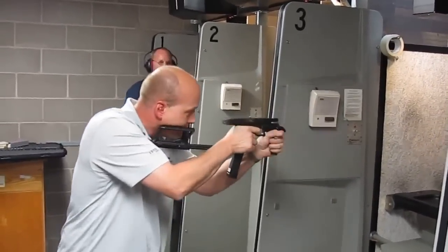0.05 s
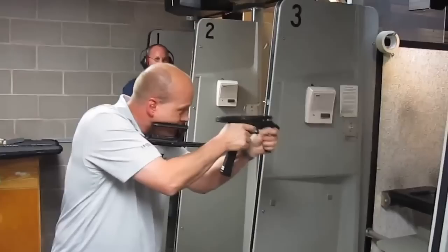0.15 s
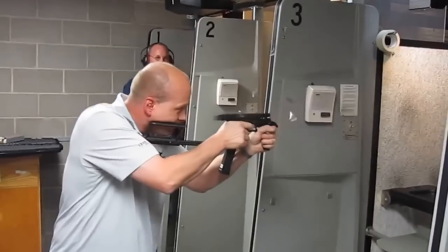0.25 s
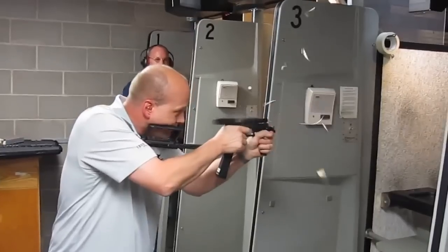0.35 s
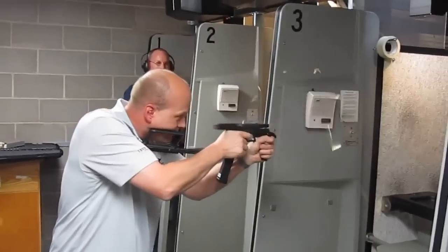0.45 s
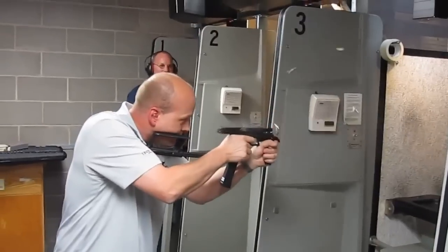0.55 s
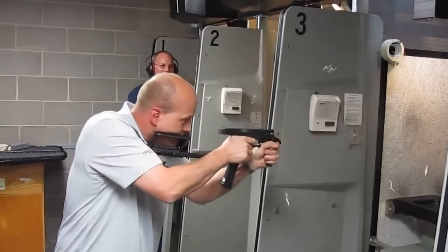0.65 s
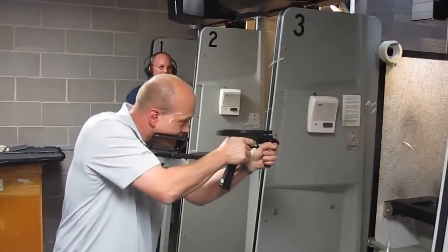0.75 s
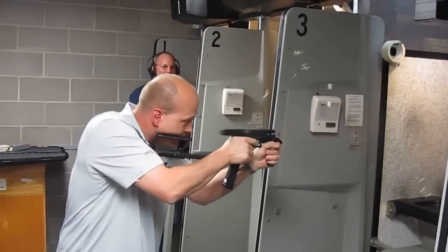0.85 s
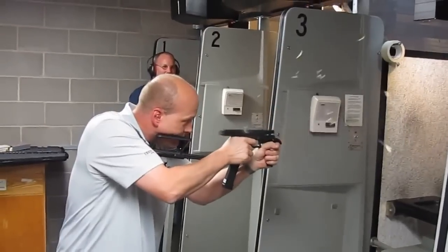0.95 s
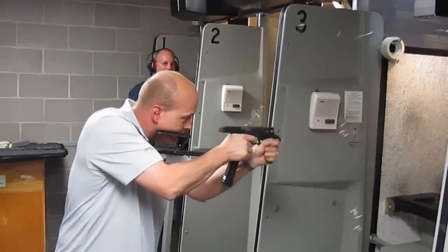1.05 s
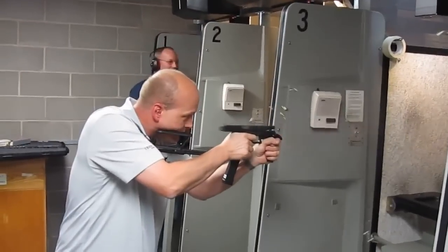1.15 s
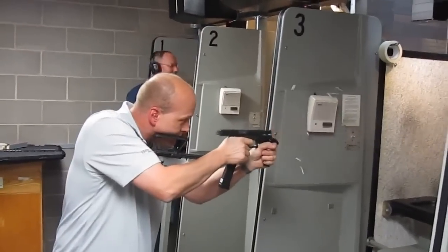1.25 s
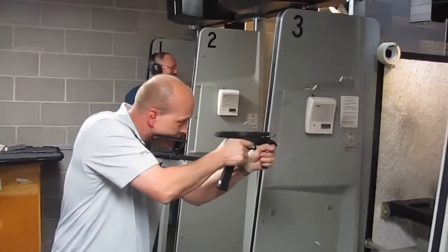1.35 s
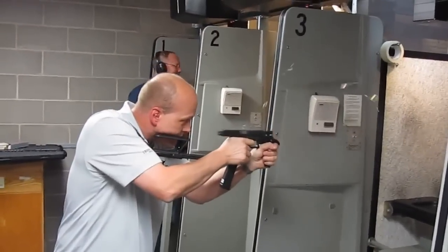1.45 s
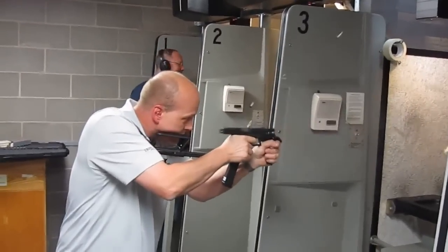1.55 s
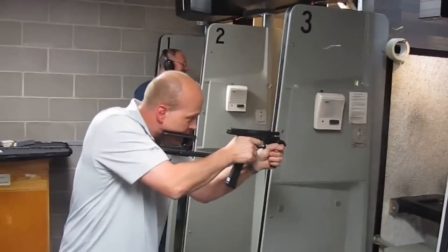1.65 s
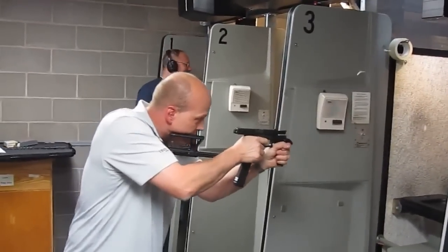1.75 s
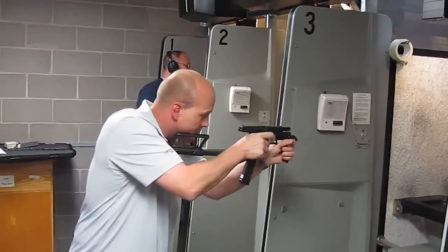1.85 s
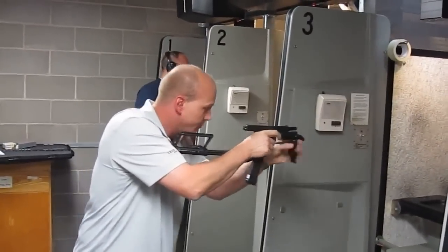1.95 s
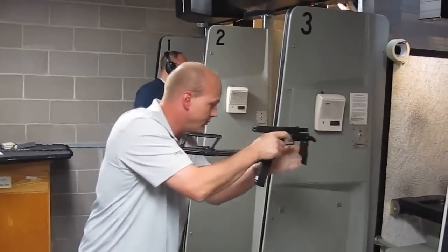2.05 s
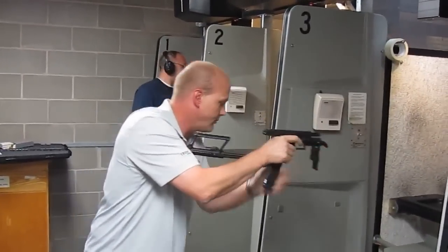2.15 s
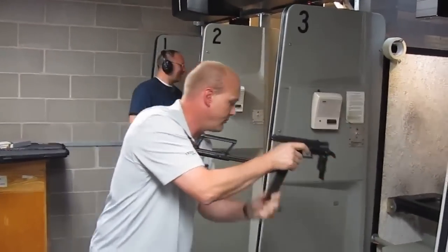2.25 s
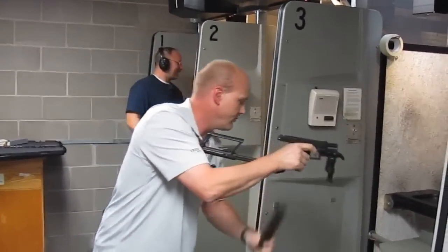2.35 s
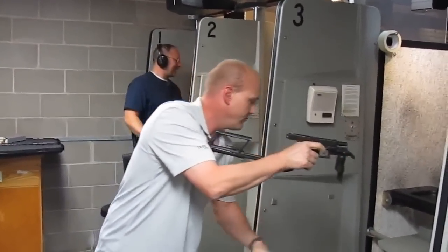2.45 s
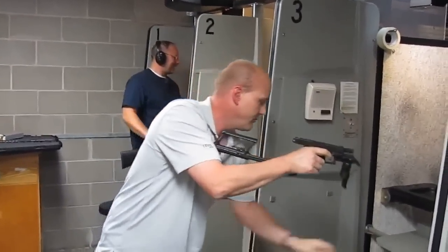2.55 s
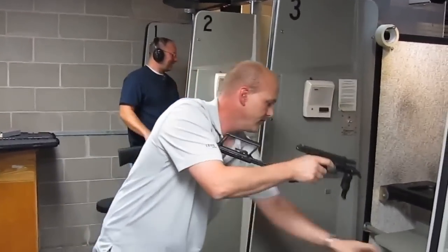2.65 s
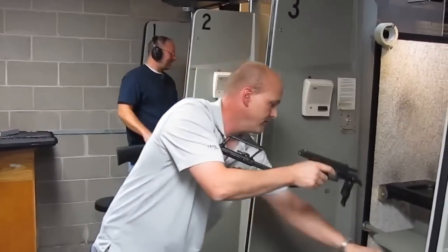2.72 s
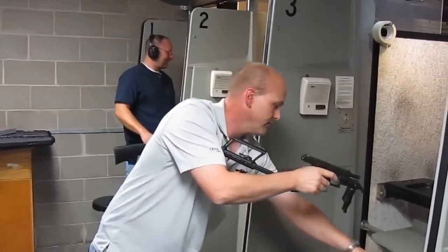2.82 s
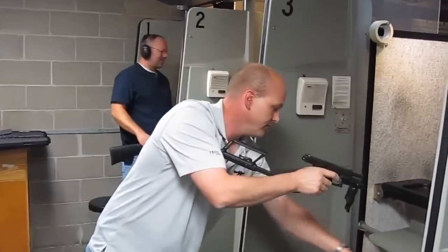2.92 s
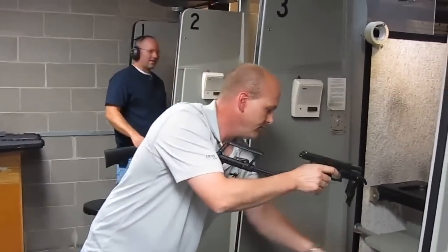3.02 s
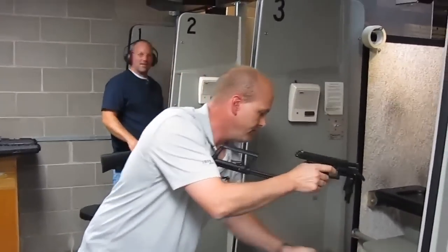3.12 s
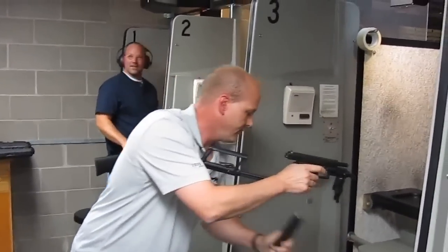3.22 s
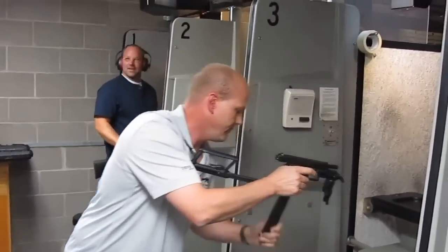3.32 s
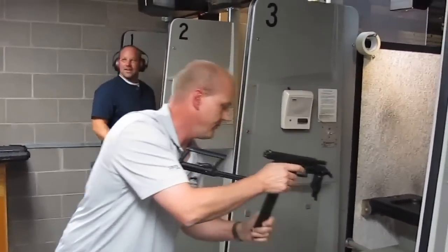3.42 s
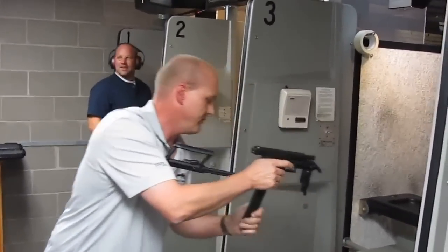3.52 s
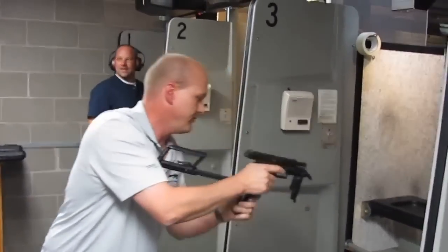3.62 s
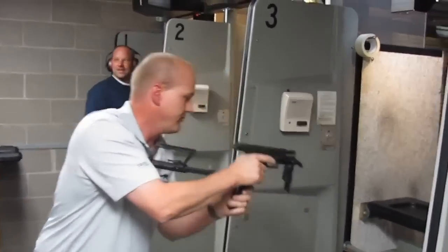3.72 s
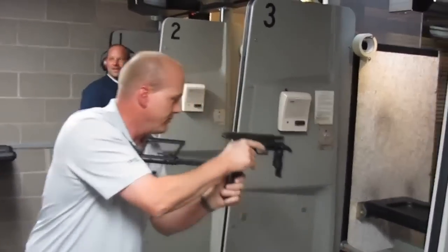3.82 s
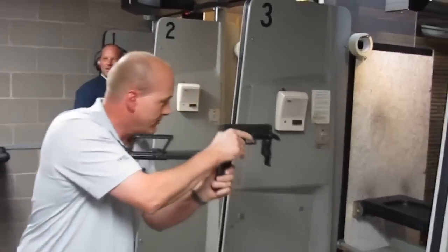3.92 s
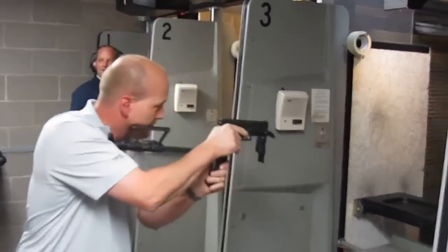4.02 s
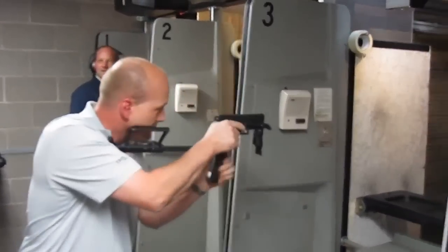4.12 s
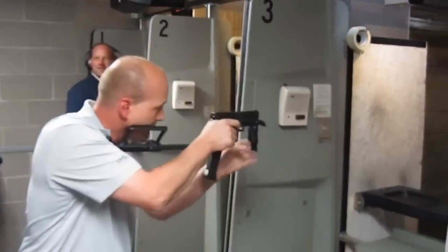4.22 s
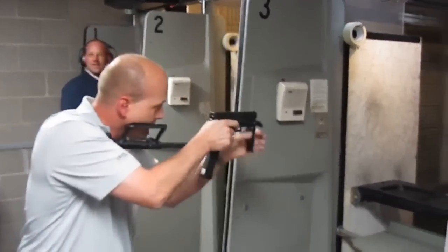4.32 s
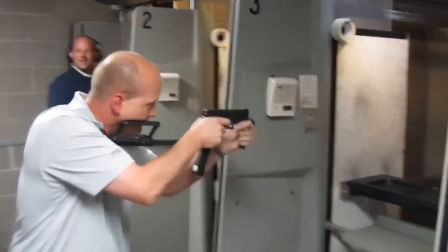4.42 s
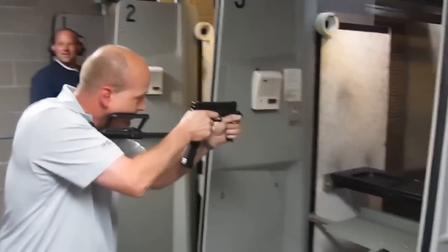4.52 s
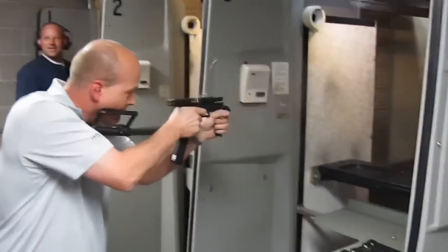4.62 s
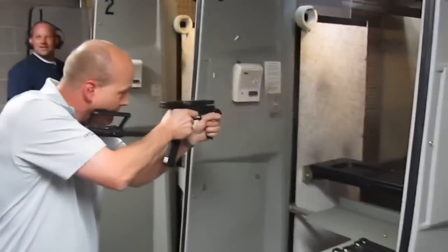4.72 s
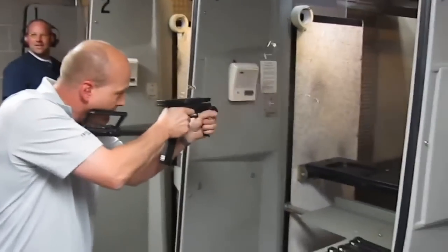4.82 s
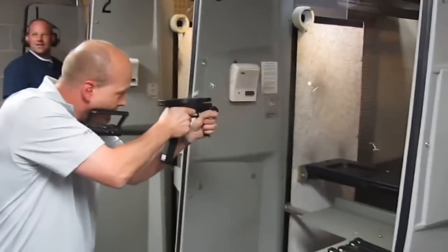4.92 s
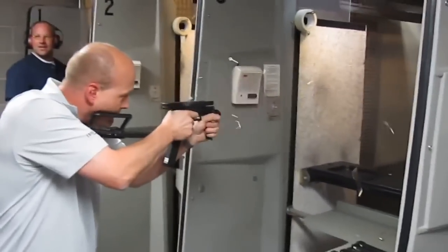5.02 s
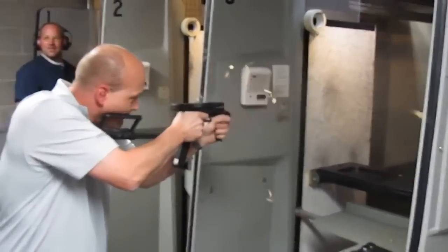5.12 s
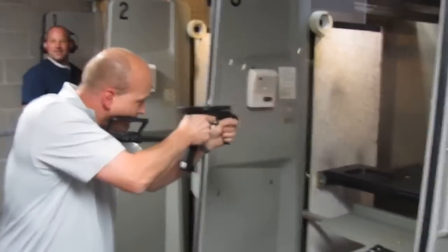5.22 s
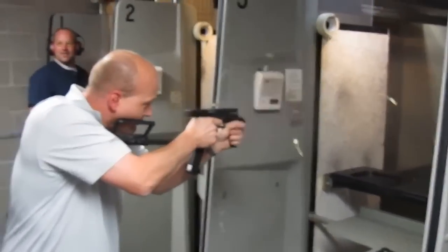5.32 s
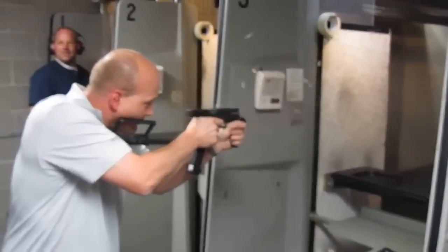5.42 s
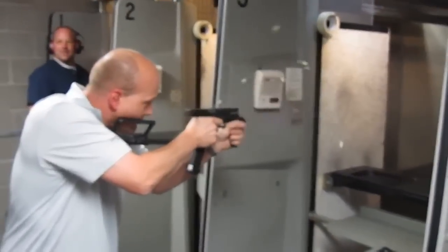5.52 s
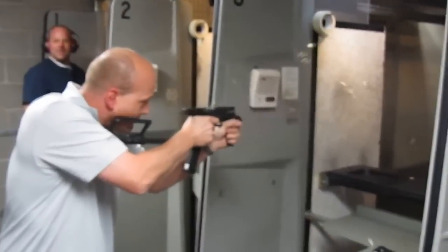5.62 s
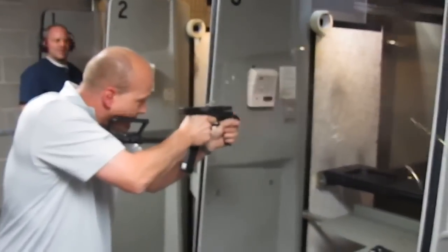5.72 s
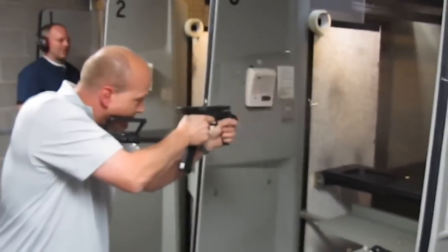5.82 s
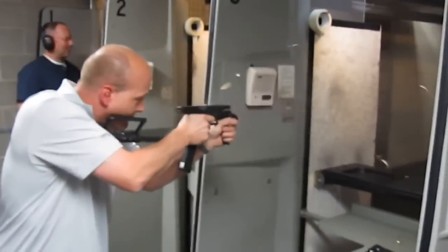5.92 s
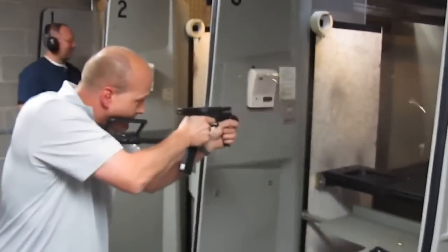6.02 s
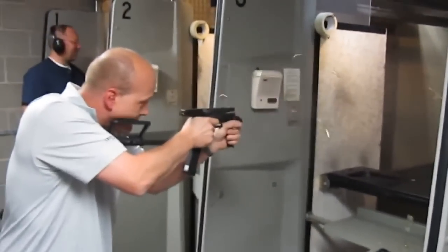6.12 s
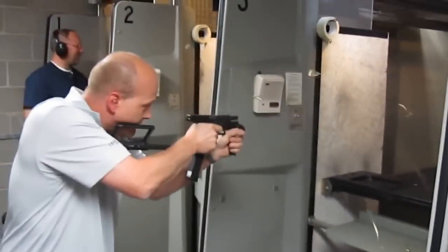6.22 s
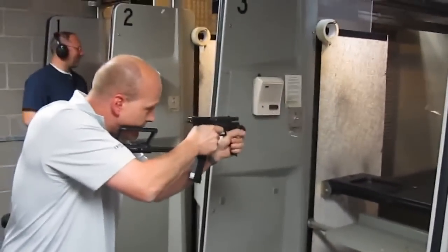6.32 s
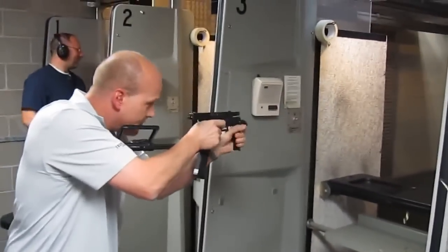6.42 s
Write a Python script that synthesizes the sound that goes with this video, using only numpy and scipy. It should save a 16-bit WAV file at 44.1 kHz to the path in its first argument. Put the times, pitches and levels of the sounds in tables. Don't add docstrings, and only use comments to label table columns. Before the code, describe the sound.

An automatic pistol empties two fast bursts in a hard indoor range, with ringing casings and metallic magazine-change knocks in the short gap between.

```python
import sys
import numpy as np
from scipy import signal
from scipy.fft import rfft, irfft
from scipy.io import wavfile
from scipy.ndimage import uniform_filter1d

SR = 44100
rng = np.random.default_rng(int(sys.argv[2]) if len(sys.argv) > 2 else 0)


def generate_wav(sig):
    pcm = np.round(np.clip(np.atleast_2d(sig).T, -1, 1) * 32767).astype(np.int16)
    wavfile.write(sys.argv[1], SR, pcm)


def gain_from_db(level_db):
    decades = np.asarray(level_db, float) / 20
    return 10 ** decades


N = 284886
TIME = np.arange(N) / SR

# [f/Hz, level/dB per Hz]
DRONE_COLOUR = [(15, -40), (30, 8), (60, 3), (160, -7.5), (420, -12), (750, -5.5), (1400, -6.5),
                (2000, -15), (2900, -17.5), (3900, -29.5), (5300, -29.5), (7000, -36), (10500, -46.5),
                (12500, -67)]
# [f/Hz, side minus mid/dB]
DRONE_WIDTH = [(60, -23.5), (110, -19), (200, -25), (380, -16), (700, -20), (1290, -14), (2380, -13),
               (4400, -7), (8120, 0), (15000, 1)]
# [f/Hz, width/Hz, level/dB]
DUCT_MODES = [(122.8, 8, -1), (197, 6.3, 0), (276, 36, 4), (343, 34, -3.5), (380, 3.6, -10), (416, 11, 3.5),
              (487, 5.6, 7.5), (524, 5.9, -18), (624, 5.7, -4), (660, 5.9, -3), (730, 13, -5)]
# [t/s, level/dB]
DRONE_RIDE = [(0, -29), (.047, -31), (.06, -53), (2.2, -37), (2.6, -40), (3, -40.5), (3.4, -38.5),
              (3.95, -35), (4.05, -35), (4.2, -33), (4.6, -28), (4.62, -53), (6.46, -62)]
# [t/s, level/dB]
UPPER_AIR = [(0, -2), (2.2, 3.5), (3.6, 1.5), (4.15, 1), (4.6, -4), (6.46, -4)]

# [f/Hz, width/Hz, level/dB]
BRASS_MODES = [(10670, 28, -8), (10725, 24, -7), (10790, 28, -7), (10860, 50, -11), (11020, 70, -12)]
# [t/s, level/dB]
ROLL_LEVEL = [(1.85, -74), (2.04, -44), (2.68, -47.5), (3.1, -45), (3.46, -44.5), (3.8, -48.5), (3.95, -56),
              (4.07, -55), (4.19, -70)]
# [t/s, level/dB]
ROLL_BUMPS = [
    (1.91, -40),
    (2.71, -47),
    (2.91, -42),
    (3.03, -56),
    (3.46, -47),
]
ROLL_SPAN = slice(78000, 190000)
BUMP_RISE_S, BUMP_FALL_DB_PER_S = 0.029, 131

# [t/s, bright level/dB, dull level/dB, dull f/Hz,
# t60/s]
HANDLING = [(2.0992, -19, -23, 1860, 0.16), (2.1475, -23.5, -25, 1820, 0.18), (2.189, -28, -21, 2400, 0.16),
            (2.2312, -45, -24, 2590, 0.059), (2.4846, -30, -21, 1975, 0.12), (2.5278, -33, -35, 1800, .52),
            (2.6491, -33, -20.5, 2530, 0.13), (2.7425, -31, -36, 2800, .06), (2.7492, -21, -25, 2130, 0.4),
            (2.9305, -28, -29.5, 2010, 0.34), (3.12, -35, -26, 2570, 0.19), (3.1355, -33, -34, 2120, 0.4),
            (3.2032, -31, -20.5, 2100, 0.19), (3.2606, -38, -35, 2000, 0.82),
            (3.5204, -38.5, -40, 1970, 0.43), (3.6688, -22.5, -25.5, 2050, 0.24),
            (3.9602, -34, -42, 3360, .2), (3.968, -24, -30, 1960, .22), (3.9759, -21, -26, 1910, .2),
            (3.9843, -11, -22, 1820, 0.11), (4.0002, -17.5, -29, 2870, 0.14), (4.016, -31, -37, 1820, 0.6),
            (4.6035, -14, -40, 2600, 0.14)]
# [f/Hz, level/dB per Hz]
RATTLE_COLOUR = [(600, -23.5), (1200, -9.5), (2200, -16), (3300, -12), (4000, -8), (4900, -10), (6250, -8),
                 (8000, -13.5), (10500, -20.5), (12500, -27), (15400, -39)]
# [f/Hz, side minus mid/dB]
KNOCK_WIDTH = [(60, 4), (110, -10), (200, -17), (380, -20), (700, -15), (1290, -17), (2380, -13.5),
               (4400, -7), (8120, -5), (15000, 3)]
# [f/Hz, level/dB, t60/s]
METAL_RINGS = [(1440, -13, 0.13), (2090, -14, 0.38), (2860, -9, 0.19), (4600, -13, 0.078),
               (5800, -5, 0.099), (6300, 3, 0.1), (10000, -4, 0.06), (6460, -18, 0.27), (7500, -22, 0.22),
               (8200, -2, 0.19)]
# [delay t/s, level/dB]
PARTITION_ECHOES = [
    (.0033, -9.5),
    (.009, -8),
    (0.018, -9),
    (.029, -8),
]
# [share of its pitch, level/dB]
PART_TONES = [(1, -13), (0.36, -5), (1.2, -6)]
# [t/s, bright level/dB, dull level/dB]
CASING_TICKS = [(2.247, -37, -30), (2.2867, -40, -39), (2.3216, -32.5, -49), (2.363, -38, -53),
                (2.3874, -41, -47), (2.4424, -41, -32), (2.5864, -36, -55), (2.6796, -38, -46),
                (2.7117, -42, -48), (2.8763, -39, -51), (2.898, -35, -50), (3.0155, -44, -38),
                (3.095, -42, -41), (3.1896, -39, -53), (3.309, -46, -38), (3.343, -40, -38.5),
                (3.3584, -44, -37), (3.3905, -46, -41), (3.432, -43, -38), (3.4984, -45, -36),
                (3.6192, -47, -42), (3.6444, -44, -40), (3.8684, -51, -42), (4.2554, -53, -49)]
# [t/s, level/dB, f/Hz, t60/s]
CONTACTS = [(2.0992, -19, 5120, .04), (2.102, -23, 6300, .03), (2.19, -17, 2510, .015),
            (2.233, -23, 2550, .02), (2.3216, -44, 5280, 0.12), (2.4846, -32, 5600, .02),
            (2.6491, -21.5, 3160, 0.019), (2.6525, -31, 2280, .03), (2.702, -36, 7500, .004),
            (2.7168, -39, 8000, .004), (2.7205, -37, 8200, .004), (2.7428, -27, 2900, .015),
            (2.7492, -20, 5400, .02), (2.7525, -21, 6130, .025), (2.7575, -30, 2180, .04),
            (2.7655, -24, 5850, .03), (2.9305, -32, 2980, 0.024), (2.934, -30, 1970, 0.13),
            (3.1238, -32, 3060, 0.021), (3.1375, -28, 2080, .08), (3.188, -36, 9500, .01),
            (3.191, -33, 8000, .008), (3.2065, -25, 2080, 0.035), (3.2195, -37, 2300, .03),
            (3.42, -34, 1900, .03), (3.433, -36, 4300, .01), (3.515, -37, 3520, 0.044),
            (3.669, -27, 5860, .03), (3.6698, -25, 3400, 0.022), (3.6785, -32, 2120, .04),
            (3.9843, -17, 6370, 0.013), (3.9846, -10, 8900, .012), (4.0005, -22, 6450, 0.024)]
# [t/s, level/dB, first ring f/Hz,
# second ring level/dB, second ring f/Hz]
PINGS = [
    (2.7965, -37, 11200, -47, 14790),
    (3.1921, -36, 11150, -46, 14790),
    (3.3594, -53, 11200, -50, 14800),
    (3.4974, -41, 11100, -48, 14900),
    (3.5389, -35, 11100, -65, 14900),
    (3.9843, -20, 10300, -48, 12300),
]
SCATTER_PAN_DB = -0.5
TICK_HZ, TICK_T60 = 2040, 0.16
TINKLE_HZ, TINKLE_DB, TINKLE_T60 = 5150, -14, 0.32

# [f/Hz, level/dB per Hz]
SLAM_COLOUR = [(18, -55), (30, -14), (102, -7), (140, -8.5), (318, 0.5), (411, 2.5), (596, 1), (900, -15),
               (1170, -43), (1980, -120)]
# [f/Hz, side minus mid/dB]
SLAM_WIDTH = [(60, 1), (110, 16), (200, 14.5), (380, 2), (700, 11), (1290, 1), (2380, -5), (4400, -3),
              (8120, -4.5), (15000, 2)]
# [t/s, level/dB, t60/s]
SLAMS = [
    (.048, -20, 0.41),
    (4.607, -22, 1),
]

# [f/Hz, level/dB per Hz]
RASP_COLOUR = [(35, -64), (60, -1), (138, -8), (442, -4.5), (754, -1.5), (2000, -3.5), (3180, -7),
               (4020, -12), (5430, -10.5), (7350, -13.5), (12500, -24.5), (14100, -29), (15400, -62.5)]
# [f/Hz, side minus mid/dB]
RASP_WIDTH = [(100, 10), (250, 13.5), (600, 14.5), (1500, -0.5), (4000, -1.5), (9000, -3), (15000, 5.5)]
# [first blast/dB, early sag t/s, sag/dB, settling t/s, settled/dB, last round/dB]
OVERLOAD = [
    (-14, 0.095, -14, 1, -14.5, -13),
    (-11, 0.049, -19, 0.82, -13.5, -13.5),
]
# [t after the last round/s, level/dB]
OVERLOAD_RELEASE = [
    (.1, -26.5),
    (.185, -21),
    (.3, -35),
]
RASP_CHOKE = .5

# [t/s, brightening of the early echoes/dB per octave]
FIRST_SHOTS = [
    (0.047, -0.9),
    (4.607, 0),
]
# [round number, t its blast chokes the capsules/s]
SLIDE_PACE = [
    [(0, .0997), (17, .9471), (18, .9951), (30, 1.5957)],
    [(0, 4.6602), (26, 5.9629), (27, 6.0163), (30, 6.1676)],
]
# [first round/dB, last round/dB, extra sag as the wind filter closes/dB]
REGAINED = [
    (-5.5, -5, -5),
    (-7, -4, -4.5),
]
# [t after the shot/s, level/dB]
WALL_RETURNS = [
    (.0022, -3.5),
    (.0065, 3.5),
    (.019, 1.5),
    (.0245, -3),
    (.0325, -1.5),
]
# [f/Hz, level/dB per Hz]
HALL_COLOUR = [(35, -75), (60, -25.5), (180, -31.5), (259, -26.5), (412, -16.5), (508, -13), (672, -6),
               (888, -8.5), (974, -3.5), (1780, -10.5), (2300, -10), (4020, -17.5), (7010, -17.5),
               (15400, -36.5)]
# [f/Hz, side minus mid/dB]
HALL_WIDTH = [(60, -13.5), (110, -23), (200, -18), (380, -23), (700, -18.5), (1290, -12), (2380, -11.5),
              (4400, -7), (8120, -1), (15000, 3)]
# [f/Hz, t60/s]
HALL_DECAY = [(100, 3.25), (300, 2.3), (410, 1.64), (560, 1.08), (700, 1.28), (1000, 1.245), (1400, 1.145),
              (2000, 1.05), (5000, 0.89), (10000, 0.51), (15000, 0.22)]
# [f/Hz, width/Hz, level/dB]
STALL_MODES = [(833.6, 14, 7), (1063, 17, 3), (341, 6.9, 5), (390, 6.3, -7), (680, 14, -9), (1510, 29, 6),
               (1680, 66, 2), (1860, 39, 6), (2160, 38, 3.5)]
# [f/Hz, level/dB]
EARLY_COLOUR = [(200, 2), (600, -3.5), (1000, -2.5), (1500, 1.5), (2100, 0), (2800, -1), (3600, -2),
                (6000, 3.5), (12000, -11)]
JITTER_S, ROUND_SPREAD_DB, SAG_WIDTH_S = .0006, 1.1, 0.037
FRESH_CAPSULES_DB = (0.5, 5)
CHOKE_DB, CHOKE_HOLD_S, CHOKE_RISE_S, CHOKE_CREEP_DB = 11.5, .03, .012, 4
OPENING_CHOKE = 0.91
RETURN_WIDTH_S = .002
HEADROOM_DB, FREE_DB = 13.5, -8.5
SHOT_SPREAD = 0.6
FIRST_BLAST_DB, FIRST_BLAST_S = (0, -3.5), 0.013

# [f/Hz, level/dB]
TREBLE_GATE = [(6000, -95), (9000, -66), (11300, -57), (12000, -53), (13000, -52.5), (14200, -57),
               (14800, -49), (16000, -45)]
CUT_CLOSES_S, CUT_CLOSING_S = (.15, 4.79), .045
CUT_OPEN, CUT_SHUT, CUT_EASED, CUT_OPENS_PER_S = 1, 3.24, (3.03, 3.3), 0.89
CUT_GAPE, CUT_GAPE_S = (0.71, 0.86), 0.1
CUT_OVERSHOOT, CUT_OVERSHOOT_S = (.1, .45), .3
CUT_STEEP = 0.27
MIC_NOTCH_HZ, MIC_NOTCH_WIDTH_HZ, MIC_NOTCH_DB = 4030, 520, -5
LONE_BINS = 0.49
STRAY_SHARE, STRAY_REACH_DB, STRAY_DB = .07, 20, 6
THUD_KNEE, THUD_HZ, THUD_DB = .85, 260, -4


def evened(x):
    return x / np.sqrt(np.mean(x ** 2) + 1e-20)


def read(points, hz):
    f, value = np.transpose(points)
    return np.interp(np.log(hz + 1), np.log(f + 1), value)


def curve(rows, outside=-120):
    s, value = np.transpose(rows)
    return np.interp(TIME, s, value, outside, outside)


def add(mix, s, sound):
    part = mix[:, round(s * SR):][:, :sound.shape[1]]
    part += sound[:, :part.shape[1]]


def peaks_db(peaks, f, lift_db):
    total = sum(gain_from_db(db + lift_db) / (1 + ((f - hz) / width * 2) ** 2) for hz, width, db in peaks)
    return 20 * np.log10(1 + total)


def wide_noise(size, db_of, side):
    hz = np.fft.rfftfreq(size, 1 / SR)
    z = rfft(rng.standard_normal((2, size))) * gain_from_db(db_of(hz))
    mid, across = irfft(z * gain_from_db([0 * hz, read(side, hz)]), size)
    return np.array([mid + across, mid - across]) / np.std(mid)


def drone():
    air = wide_noise(N, lambda f: read(DRONE_COLOUR, f) + peaks_db(DUCT_MODES, f, lift_db=6.5), DRONE_WIDTH)
    wobble_db = 1.2 * evened(uniform_filter1d(rng.standard_normal(N), size=3000))
    high_pass = signal.firwin(65, 1600, fs=SR, pass_zero=False)
    upper = signal.oaconvolve(air, high_pass[None], "same")
    return (air + upper * (gain_from_db(curve(UPPER_AIR)) - 1)) * gain_from_db(curve(DRONE_RIDE) + wobble_db)


def rolling():
    shape = (len(BRASS_MODES), 2, len(TIME[ROLL_SPAN]))
    strength = gain_from_db(2.0 * rng.exponential(1, shape))
    taps = strength * (rng.random(shape) < 60 / SR)
    t = np.arange(6000) / SR
    start = np.minimum(t / 0.0024, 1) ** 2
    rung = 0
    for tap, (hz, width, db) in zip(taps, BRASS_MODES):
        ring = gain_from_db(db) * start * np.exp(-np.pi * width * t) * np.sin(2 * np.pi * hz * t)
        rung = rung + signal.oaconvolve(tap, ring[None], axes=1)[:, :shape[2]]
    power = abs(uniform_filter1d((rung ** 2).mean(0), size=6000))
    out = np.zeros((2, N))
    out[:, ROLL_SPAN] = rung / np.sqrt(power + 1e-9)
    levels_db = [curve(ROLL_LEVEL)]
    for s, db in ROLL_BUMPS:
        levels_db.append(curve([(s - BUMP_RISE_S, db - 11), (s, db), (s + .5, db - BUMP_FALL_DB_PER_S / 2)]))
    return out * uniform_filter1d(sum(gain_from_db(db - 2) for db in levels_db), size=600)


def knock(bright_db, dull_db, dull_hz, t60):
    size, pan_db = 8192, SCATTER_PAN_DB * rng.standard_normal()
    t = np.arange(size) / SR
    arrivals = [(0.003, 0)] + PARTITION_ECHOES
    cracks = sum(gain_from_db(db - 60 * np.abs(t - s) / 0.026) * (t >= s) for s, db in arrivals)
    fall = (cracks + 1.78 * gain_from_db(-60 * t / np.maximum(t60, .03))) * np.minimum(t / 0.00021, 1)
    bright = wide_noise(size, lambda f: read(RATTLE_COLOUR, f), KNOCK_WIDTH)
    high_pass = signal.firwin(65, 8500, fs=SR, pass_zero=False)
    top = signal.oaconvolve(bright, high_pass[None], "same")
    bright += top * (gain_from_db(3 + 0.2 * (bright_db + 24) - 60 * t / 0.55) - 1)
    dull = wide_noise(size, lambda f: -10 * np.log10(1 + ((f - dull_hz) / 260) ** 2 + (f / 3500) ** 8),
                      KNOCK_WIDTH)
    scatter = (gain_from_db(bright_db - 12.0) * bright + gain_from_db(dull_db - 11) * dull) * fall

    hz, db, ring_s = np.transpose(METAL_RINGS)[:, :, None]
    chance = rng.standard_normal((2, len(METAL_RINGS), 1))
    ring_level = gain_from_db(db + 3.5 * chance[0] - 60 * t / np.clip(ring_s, .03, .35))
    rings = ring_level * np.sin(2 * np.pi * hz * (1 + 0.017 * chance[1]) * t)
    tones = sum(gain_from_db(db) * np.sin(2 * np.pi * share * dull_hz * t) for share, db in PART_TONES)
    struck = gain_from_db(bright_db - 16.5) * rings.sum(0) + gain_from_db(dull_db - 2.0 - 60 * t / 0.096) * tones
    return (scatter + struck) * gain_from_db([[pan_db / 2], [-pan_db / 2]]) * np.cos(np.pi / 2 * t / t[-1])


def tick(bright_db, dull_db):
    body = knock(bright_db, dull_db, TICK_HZ * (1 + 0.078 * rng.standard_normal()), TICK_T60)
    t = np.arange(body.shape[1]) / SR
    hz = TINKLE_HZ * (1 + 0.021 * rng.standard_normal((2, 1)))
    tinkle = gain_from_db(bright_db + TINKLE_DB - 60 * t / TINKLE_T60) * np.sin(2 * np.pi * hz * t)
    return body + tinkle.sum(0)


def snap(db, hz, t60):
    t = np.arange(2048) / SR
    detune = 1 + 0.048 * rng.standard_normal((2, 1)) * [[.3], [1]]
    modes = np.sin(2 * np.pi * hz * detune * t) * [[1], [.6]]
    ring = modes.sum(0) * gain_from_db(db - 60 * t / np.maximum(t60, .004))
    return np.array([ring, np.roll(ring, rng.integers(-1, 2))])


def ping(db, hz, second_db, second_hz):
    t = np.arange(SR // 3) / SR
    out = np.zeros((2, len(t)))
    for level_db, ring_hz, t60 in (db - 3, hz, .12), (second_db, second_hz, .2):
        noise = rng.standard_normal((2, 2, len(t)))
        flutter = signal.oaconvolve(noise, np.blackman(200)[None, None], "same")
        flutter = 1 + (flutter[0] + 1j * flutter[1]) / flutter.std()
        out += gain_from_db(level_db - 60 * t / t60) * (flutter * np.exp(2j * np.pi * ring_hz * t)).imag
    contact = np.diff(rng.standard_normal((2, len(t) + 2)), 2) * gain_from_db(second_db - 8 - 60 * t / .02)
    return out * np.minimum(t / 0.0028, 1) + contact


def thump(db, t60):
    t = np.arange(SR // 2) / SR
    return wide_noise(len(t), lambda f: read(SLAM_COLOUR, f), SLAM_WIDTH) * gain_from_db(db - 60 * t / t60)


def overload(start, end, first_db, sag_s, sag_db, settle_s, settled_db, last_db):
    during = [(start, first_db), (start + sag_s, sag_db), (start + settle_s, settled_db), (end, last_db)]
    return gain_from_db(curve(during + [(end + s, db) for s, db in OVERLOAD_RELEASE]))


def rasp(choked_db):
    flicker_db = 1.4 * evened(uniform_filter1d(rng.standard_normal((2, N)), size=90))
    level = sum(overload(shot[0], pace[-1][1], *row)
                for shot, pace, row in zip(FIRST_SHOTS, SLIDE_PACE, OVERLOAD))
    noise = wide_noise(N, lambda f: read(RASP_COLOUR, f) - read(RASP_WIDTH, f), RASP_WIDTH)
    low = signal.oaconvolve(noise, signal.firwin(129, 3800, fs=SR)[None], "same")
    choked_low = low * gain_from_db(RASP_CHOKE * choked_db + 2.5)
    return (noise - low + choked_low) * gain_from_db(flicker_db) * level


def rounds(pace, closes_s, fresh_db, first_db, last_db, sag_db):
    number, at = np.transpose(pace)
    chance = rng.standard_normal((int(number[-1]) + 1, 2))
    count = np.arange(len(chance))
    s = np.interp(count, number, at) + JITTER_S * chance[:, 0]
    regained_db = np.linspace(first_db, last_db, len(s))
    regained_db += sag_db * np.exp(-((s - closes_s - CUT_CLOSING_S) / SAG_WIDTH_S) ** 2)
    regained_db += fresh_db * np.exp(-count / 2.0) + ROUND_SPREAD_DB * chance[:, 1]
    return np.transpose([s, regained_db])


def choke(burst):
    s, recovered_db = np.transpose(burst)
    last = np.searchsorted(s, TIME) - 1
    since = TIME - np.append(s, s[0] - .05)[last]
    back = np.clip((since - CHOKE_HOLD_S) / CHOKE_RISE_S, 0, 1)
    held_db = CHOKE_DB - CHOKE_CREEP_DB * np.clip(since / CHOKE_HOLD_S, 0, 1)
    depth_db = held_db * (1 - back * back * (3 - 2 * back))
    depth_db -= sum(db * np.exp(-((since - delay) / RETURN_WIDTH_S) ** 2) for delay, db in WALL_RETURNS)
    depth_db *= np.where(last < 0, OPENING_CHOKE * (since > .0035), 1)
    level_db = np.append(recovered_db - 4.0, FREE_DB)[last + 1]
    return uniform_filter1d([-depth_db, level_db], size=40)


def hall_tail():
    noise = wide_noise(3 * SR // 2, lambda f: read(HALL_COLOUR, f) + peaks_db(STALL_MODES, f, lift_db=-6.0),
                       HALL_WIDTH)
    hz, t, z = signal.stft(noise, SR, nperseg=512)
    return signal.istft(z * gain_from_db(-60 * t / read(HALL_DECAY, hz)[:, None]), SR, nperseg=512)[1]


def roar(opening, burst, first_db):
    first_s, tilt_db = opening
    shots = np.append(first_s, np.transpose(burst)[0] - .002)
    turn = SHOT_SPREAD * rng.standard_normal(len(shots))
    late, at = np.zeros((2, N)), ((shots - first_s) * SR).astype(int)
    for third in range(3):
        train = np.zeros((1, at[-1] + 1), np.float32)
        train[0, at] = np.cos(turn + third * 2 * np.pi / 3)
        add(late, first_s, signal.fftconvolve(train, hall_tail(), axes=1))
    power = uniform_filter1d(late.mean(0) ** 2, size=1500, origin=-500)
    ceiling = power[int(shots[-1] * SR)] / gain_from_db(2 * HEADROOM_DB)

    hz = np.fft.rfftfreq(N, 1 / SR)
    early_db = read(EARLY_COLOUR, hz) + tilt_db * np.log2(np.clip(hz, 700, 2600) / 1500)
    early = irfft(rfft(late) * gain_from_db(early_db), N)
    firing = np.interp(TIME, [shots[1], shots[3], shots[-1] + 0.032, shots[-1] + 0.065], [0, 1, 1, 0])
    out = (late + firing * (early - late)) / np.sqrt(np.maximum(power, 0) + ceiling)

    energy = out.mean(0) ** 2
    swing = uniform_filter1d(energy, size=300) / (uniform_filter1d(energy, size=3000) + 1e-9)
    out /= (np.abs(swing) + 0.09) ** (0.052 * firing)
    out *= gain_from_db(first_db * np.exp(-((TIME - first_s) / FIRST_BLAST_S) ** 2))
    return out * gain_from_db(choke(burst).sum(0)) * np.clip((TIME - first_s) / 0.0018, 0, 1)


def wind_cut(t):
    octaves = CUT_OPEN + 0 * t
    magazines = zip(CUT_CLOSES_S, SLIDE_PACE, CUT_EASED, CUT_GAPE, CUT_OVERSHOOT)
    for closes_s, pace, eased, gape, over in magazines:
        after = t - pace[-1][1]
        shut = CUT_SHUT + over * np.exp(-((t - closes_s) / CUT_OVERSHOOT_S) ** 4)
        opening = eased - CUT_OPENS_PER_S * after - gape * np.exp(-(after / CUT_GAPE_S) ** 2)
        held = np.where(after < .03, shut, opening)
        octaves = np.maximum(octaves, held * np.clip((t - closes_s) / CUT_CLOSING_S, 0, 1))
    return 50 * 2 ** octaves


def scene():
    magazines = zip(SLIDE_PACE, CUT_CLOSES_S, FRESH_CAPSULES_DB, REGAINED)
    one, two = (rounds(pace, s, db, *row) for pace, s, db, row in magazines)
    choked_db = choke(one)[0] * (TIME < 3) + choke(two)[0]
    steady = sum(roar(*row) for row in zip(FIRST_SHOTS, (one, two), FIRST_BLAST_DB))
    steady = steady + rasp(choked_db) + rolling() + drone()
    mix, slams = np.zeros((2, 2, N))
    for s, *row in SLAMS:
        add(slams, s, thump(*row))
    litter = (HANDLING, knock), (CASING_TICKS, tick), (PINGS, ping), (CONTACTS, snap)
    for table, source in litter:
        for s, *row in table:
            add(mix, s, source(*row))
    return mix + slams * gain_from_db(0.52 * choked_db + 6.0) + steady


def roll_off(x):
    return signal.sosfilt(signal.butter(12, 15600, fs=SR, output="sos"), x)


def record(dry):
    rounded = 1.4 * np.tanh(dry / 1.33)
    hz, t, z = signal.stft(rounded, SR, nperseg=1024)
    f = hz[:, None]
    corner_hz = wind_cut(t)
    steep_hz = CUT_STEEP * corner_hz ** 2 / (50 * 2 ** CUT_SHUT)
    z = z / np.sqrt(1 + (corner_hz / (f + 1)) ** 4.17 + (steep_hz / (f + 1)) ** 10)
    z = z * gain_from_db(MIC_NOTCH_DB * np.exp(-((f - MIC_NOTCH_HZ) / MIC_NOTCH_WIDTH_HZ) ** 2))

    power = (abs(z) ** 2).mean(0)
    band_power = np.repeat(power[:512].reshape(32, 16, -1).mean(1), 16, axis=0)
    band_db = 10 * np.log10(band_power + 1e-16)
    frame_db = 10 * np.log10(power.sum(0) + 1e-16)
    margin_db = band_db - .8 * frame_db - read(TREBLE_GATE, hz[:512])[:, None]
    margin_db += LONE_BINS * (10 * np.log10(power[:512] + 1e-16) - band_db)
    whim = rng.standard_normal((32, len(t) // 3 + 1))
    whim_db = 6 * np.kron(whim, np.ones((16, 3)))[:, :len(t)]
    picked = np.repeat(rng.random((512, len(t) // 5 + 1)) < STRAY_SHARE, 5, axis=1)[:, :len(t)]
    picked = picked * (whim_db > 0) * (margin_db > -STRAY_REACH_DB) * (f[:512] < 14300)
    stray = picked * gain_from_db(np.clip(STRAY_DB - margin_db, -20, STRAY_REACH_DB))
    z[:, :512] *= np.maximum(np.clip(.5 + (margin_db + whim_db) / 1.5, 0, 1), stray)
    thinned = signal.istft(z, SR, nperseg=1024)[1][:, :N]

    over = np.sign(thinned) * np.maximum(abs(thinned) - THUD_KNEE, 0)
    low_pass = signal.butter(2, THUD_HZ, fs=SR, output="sos")
    thinned = thinned - gain_from_db(THUD_DB) * signal.sosfilt(low_pass, over)
    edge = signal.firwin(255, 15550, window=("kaiser", 8), fs=SR)
    return roll_off(signal.oaconvolve(thinned, edge[None], "same"))


dry = scene()
out = record(dry)
generate_wav(out)
```